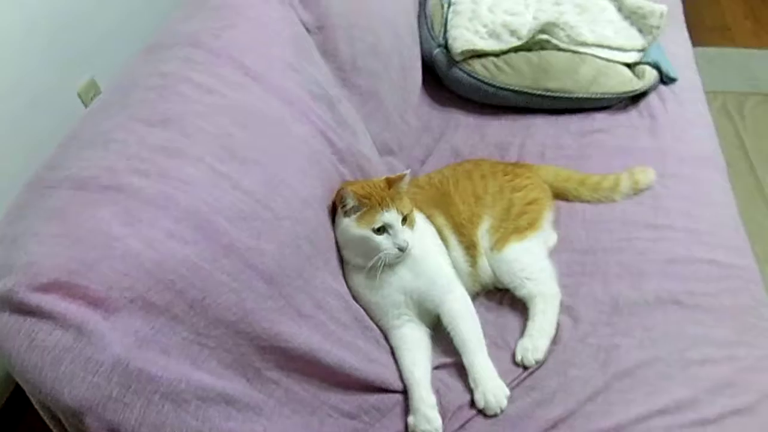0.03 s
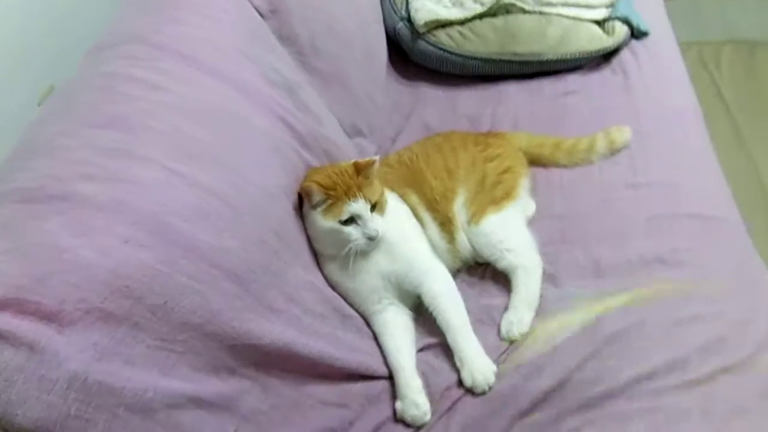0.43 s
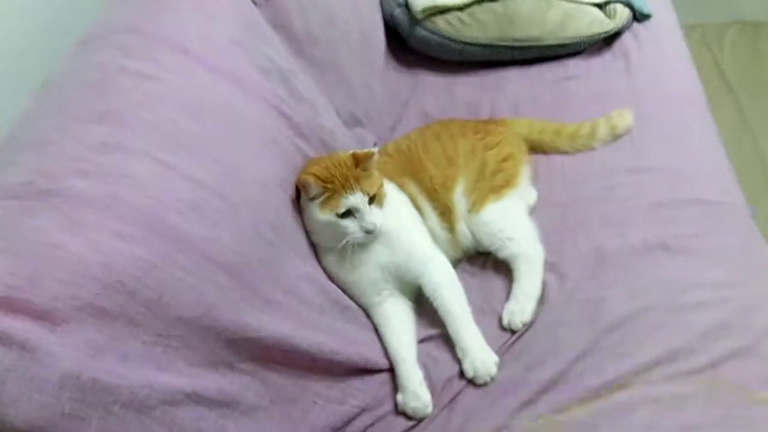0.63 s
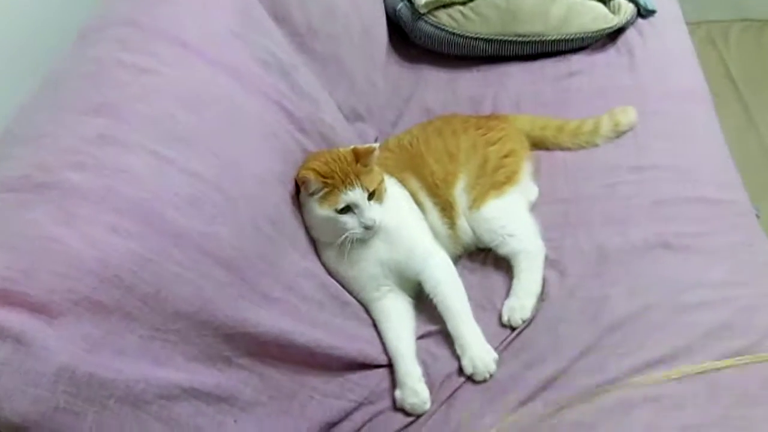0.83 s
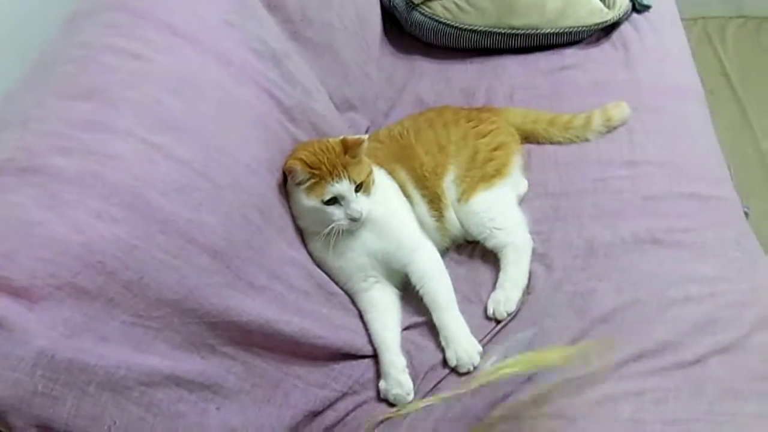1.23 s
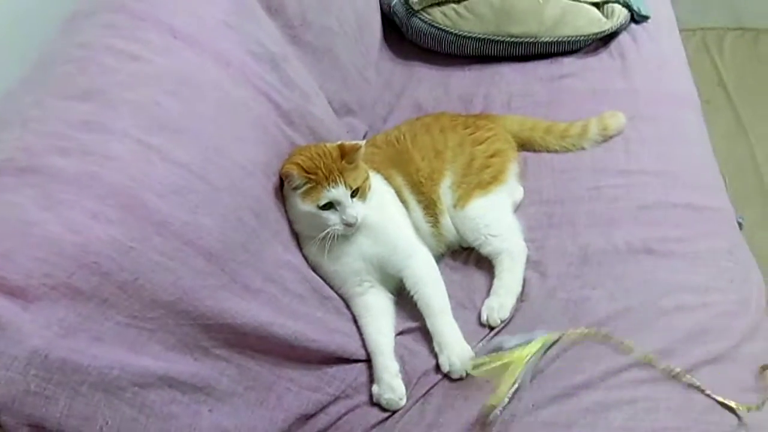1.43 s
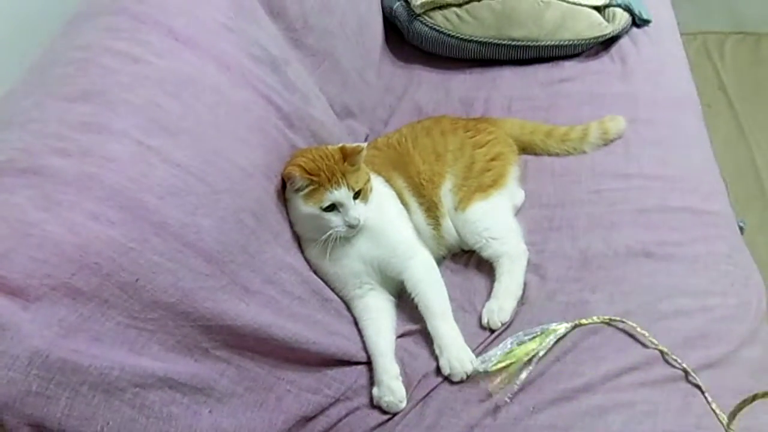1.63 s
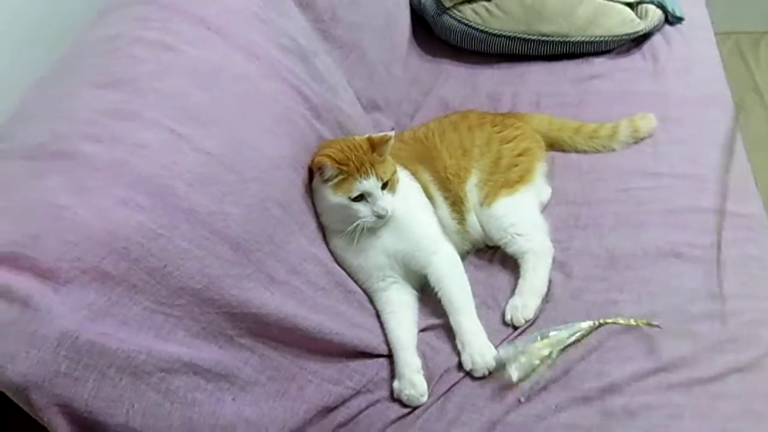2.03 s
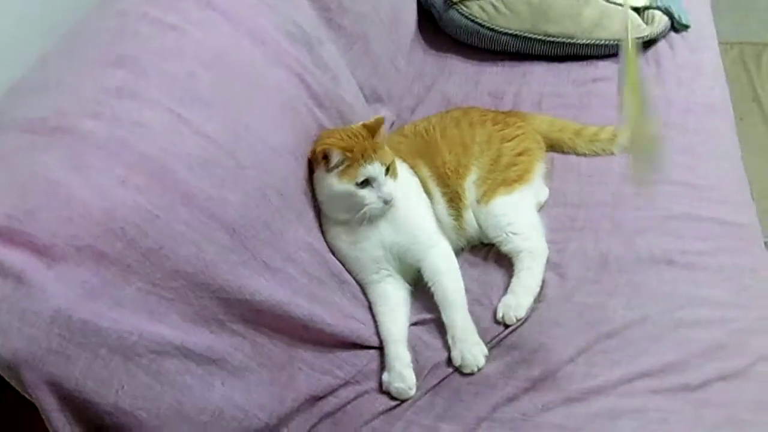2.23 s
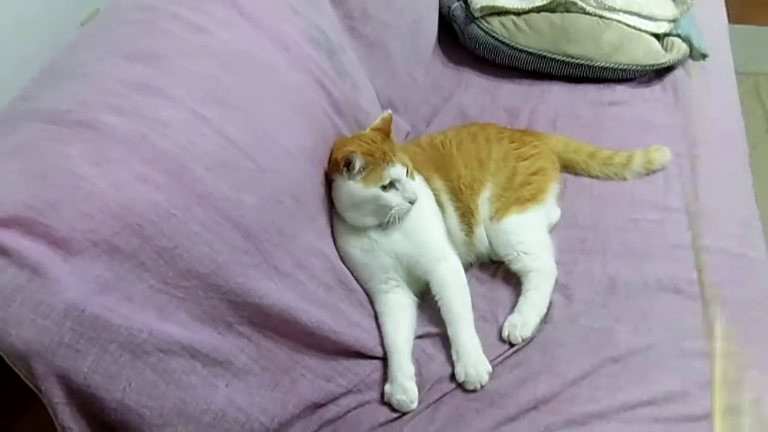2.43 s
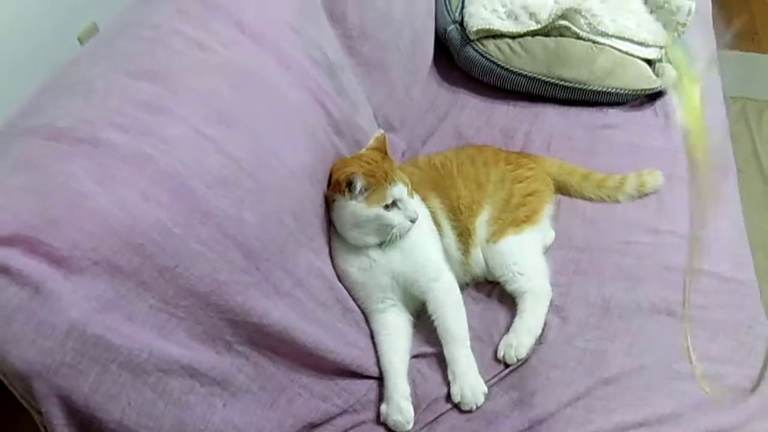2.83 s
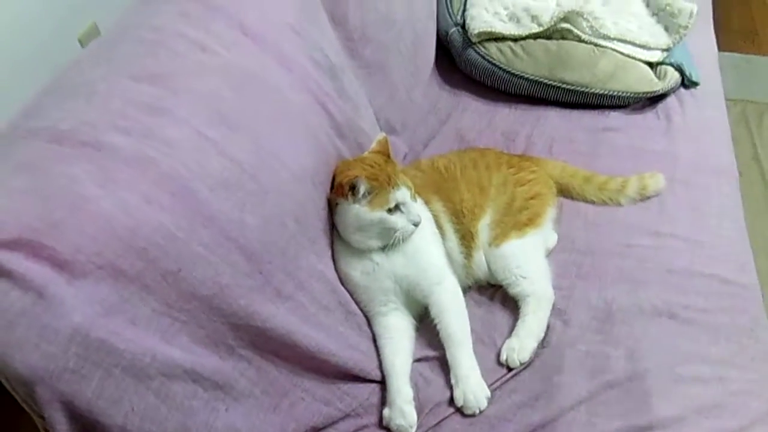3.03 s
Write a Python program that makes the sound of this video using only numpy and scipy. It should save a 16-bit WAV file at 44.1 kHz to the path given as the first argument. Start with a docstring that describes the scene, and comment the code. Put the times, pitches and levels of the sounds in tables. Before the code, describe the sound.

Crinkly rustling bursts from a tassel wand flicked over a sofa, resuming softly after a pause.

```python
"""A foil tassel on a wand is flicked over a sofa about eight times a second, rests, then is shaken softly.
At each turn the strands bunch and crinkle in a swarm of tiny clicks; some snap, and the bunch pats
the cloth. In the pause two strands tick, a faint far whine swells and the wand knocks once.
A small furnished room answers, over a low rumble and faint hiss."""
import sys
import numpy as np
from scipy import signal
from scipy.fft import rfft, irfft
from scipy.io import wavfile

SR = 44100
rng = np.random.default_rng(int(sys.argv[2]) if len(sys.argv) > 2 else 0)


def to_wav(sig):
    """Store sig (one row per channel, or 1-D mono) as 16-bit WAV at the path in sys.argv[1].

    Samples outside -1..1 are clipped; the rate is SR.
    """
    pcm = np.clip(np.atleast_2d(sig), -1, 1) * 32767
    pcm = np.round(pcm).astype(np.int16)
    wavfile.write(sys.argv[1], SR, pcm.T)  # frames by channels


N = 136710
TIME_S = np.arange(N) / SR

# Turns of the wand. Each row: peak time in seconds, crinkle level in dB, rise in seconds,
# fall in seconds, pat level in dB.
WAND_TURNS = [(.118, -45.5, 0.013, 0.03, -55), (0.231, -27.5, 0.0052, 0.012, -35),
              (0.356, -34, 0.0066, 0.02, -42.5), (0.479, -28.5, 0.0062, 0.013, -43.5),
              (.605, -37, 0.016, 0.023, -53), (0.726, -32.5, 0.016, 0.0095, -42.5),
              (0.825, -38.5, 0.024, 0.018, -48.5), (.928, -33.5, 0.016, 0.02, -46),
              (1.038, -36, 0.013, 0.015, -50.5), (1.084, -46, 0.011, .008, -57.5),
              (1.162, -41, 0.019, 0.015, -56), (1.192, -45.5, 0.0099, 0.018, -57),
              (1.977, -51, 0.012, 0.014, -65), (2.211, -39, 0.015, 0.019, -54),
              (2.326, -36.5, 0.016, 0.012, -48.5), (2.455, -44, 0.022, 0.037, -56.5),
              (2.601, -44.5, 0.024, 0.021, -61), (2.695, -45, 0.033, 0.023, -65.5),
              (2.747, -45.5, 0.032, 0.006, -64), (2.815, -39.5, 0.023, 0.02, -59),
              (3.053, -54.5, 0.049, 0.033, -62)]
# Strands whipping together. Each row: start in seconds, level in dB, decay in seconds.
STRAND_SNAPS = [(0.0994, -38, 0.0069), (0.1997, -34, 0.0014), (0.596, -38, 0.0034), (0.7057, -33, 0.0028),
                (0.809, -34.5, 0.012), (1.13, -43, .005), (2.176, -49, .005), (2.353, -43.5, .003),
                (2.578, -42.5, 0.0027), (2.686, -39.5, 0.0026)]
# Lone strands. Each row: start in seconds, level in dB, pitch in Hz, bandwidth in Hz.
STRAND_TICKS = [(1.280, -51, 5600, 1300), (1.439, -55, 8500, 1000)]
# Landings on the cushion. Each row: start in seconds, level in dB, pitch in Hz.
CUSHION_THUMPS = [(.228, -44.5, 243), (0.351, -40.5, 143), (0.716, -50, 284), (0.921, -47.5, 149)]
# Wand resonances. Each row: frequency in Hz, relative level in dB, decay in seconds.
WAND_MODES = [(494, -5, 0.0033), (793, -9.5, 0.0064), (1300, -3, 0.0041), (1870, -2, .003),
              (2330, -0.5, 0.0015), (3140, -1.5, 0.0032), (3680, 1, 0.0018)]
# Source spectra. Each row: frequency in Hz, relative spectral density in dB.
FOIL_SPECTRUM = [(100, -13), (400, -12.5), (1000, -8), (1700, -5.5), (2700, -1), (5000, -0.5), (9500, 1),
                 (15500, 1)]
PAT_SPECTRUM = [(50, -4), (130, -2.5), (260, 1.5), (390, -9), (490, -7), (700, -7.5), (1030, -7.5),
                (1400, -6.5), (1800, -18), (4000, -13), (12000, -12.5)]
RUMBLE_SPECTRUM = [(10, -0.5), (22, 0.5), (42, 0.5), (55, -3), (68, -3), (90, -13), (115, -14), (160, -17),
                   (200, -26.5), (400, -32), (1000, -57)]
HISS_SPECTRUM = [(100, 6), (350, 7.5), (600, 3.5), (1300, 4), (2300, 1.5), (4000, 0), (8000, -2),
                 (16000, -1)]


def tassel(settle_db=-19, settle_s=0.045, loose_db=-10, loose_stretch=2.1):
    """Bunched strands crinkle at each turn and slide to rest; some snap; loose ones crackle longer."""
    bunch_power = loose_power = 0
    for peak_s, db, rise_s, fall_s, _ in WAND_TURNS:
        turn = undb(db) * swell(peak_s, rise_s, fall_s)
        settle = undb(db + settle_db) * swell(peak_s, rise_s, settle_s)
        loose = undb(db + loose_db) * swell(peak_s, rise_s * loose_stretch, fall_s * loose_stretch)
        bunch_power += turn ** 2 + settle ** 2
        loose_power += loose ** 2
    snap_gain = sum(undb(db) * burst(start_s, decay_s, rise_s=0.0028, hold_s=0.0047)
                    for start_s, db, decay_s in STRAND_SNAPS)
    bunch = np.sqrt(bunch_power) * crinkle(clicks_per_s=6000)
    snaps = snap_gain * crinkle(clicks_per_s=18000)
    crackle = np.sqrt(loose_power) * crinkle(clicks_per_s=300, spread_db=3.5, fizz_s=0.0014, fizz_db=11)
    return colour(bunch + snaps + crackle, FOIL_SPECTRUM)


def crinkle(clicks_per_s, spread_db=3.7, fizz_s=0.0007, fizz_db=-2):
    """Foil buckles in random clicks of uneven size, each with a brief fizz; rms 1."""
    size = undb(spread_db * np.clip(rng.standard_normal(N), -2, 2))
    buckles = rng.random(N) < clicks_per_s / SR
    clicks = buckles * size * np.sign(rng.standard_normal(N))
    pole = np.exp(-2 / (fizz_s * SR))
    fizz_power = signal.lfilter([1 - pole], [1, -pole], clicks ** 2 + 1e-18)
    fizz = np.sqrt(fizz_power) * rng.standard_normal(N)
    return unit_rms(clicks + undb(fizz_db) * fizz)


def pats():
    """The bunch pats the cloth at each turn; some landings thump the cushion."""
    pat_gain = sum(undb(db) * swell(peak_s, rise_s, fall_s)
                   for peak_s, _, rise_s, fall_s, db in WAND_TURNS)
    thumps = 0
    for start_s, db, hz in CUSHION_THUMPS:
        envelope = burst(start_s, decay_s=0.013, rise_s=0.0041, hold_s=0.0041)
        thumps += undb(db) * envelope * noise_band(hz, width_hz=0.62 * hz)
    return pat_gain * colour(rng.standard_normal(N), PAT_SPECTRUM) + thumps


def ticks(click_db=-2):
    """Lone strands spring back in the pause: a short ring and a broad click."""
    sound = 0
    for start_s, db, hz, width_hz in STRAND_TICKS:
        envelope = burst(start_s, decay_s=0.0011, rise_s=0.0003, hold_s=0.00056)
        ring = noise_band(hz, width_hz)
        click = undb(click_db) * noise_band(hz=10000, width_hz=15000)
        sound += undb(db) * envelope * (ring + click)
    return sound


def wand_knock(start_s=2.0275, level_db=-50.5):
    """A light knock rings the wand's damped modes, alternating in sign."""
    age_s = np.maximum(TIME_S - start_s, 0)
    return sum((-1) ** k * undb(level_db + db) * np.exp(-age_s / decay_s) * np.sin(2 * np.pi * hz * age_s)
               for k, (hz, db, decay_s) in enumerate(WAND_MODES))


def room_echo(sound, t60_s=0.25, delay_s=0.008, level_db=-16):
    """Diffuse reflections: convolution with delayed, decaying noise."""
    age_s = TIME_S[:N // 4]
    onset = np.clip(age_s / delay_s - 1, 0, 1)
    response = rng.standard_normal(len(age_s)) * undb(-60 * age_s / t60_s) * onset
    response /= np.linalg.norm(response)
    return undb(level_db) * signal.fftconvolve(sound, response)[:N]


def whine(pitch_hz=1366, wander_hz=12, level_db=-69):
    """A far, wandering tone swells and stops."""
    hz = pitch_hz + wander_hz * noise_band(hz=11, width_hz=20)
    envelope = swell(peak_s=1.93, rise_s=0.12, fall_s=0.032)
    return undb(level_db) * envelope * np.sin(2 * np.pi * np.cumsum(hz) / SR)


def background(rumble_db=-53, waver_db=0.5, hiss_db=-63):
    """Wavering low rumble and steady hiss."""
    waver = undb(-waver_db * noise_band(hz=5.6, width_hz=6.1))
    rumble = undb(rumble_db) * waver * colour(rng.standard_normal(N), RUMBLE_SPECTRUM)
    hiss = undb(hiss_db) * colour(rng.standard_normal(N), HISS_SPECTRUM)
    return rumble + hiss


def undb(db):
    """Decibels to gain."""
    return 10 ** (np.asarray(db) / 20)


def unit_rms(x):
    """Scale to rms 1."""
    return x / np.sqrt(np.mean(x ** 2) + 1e-18)


def colour(x, spectrum):
    """Filter by a spectrum, keeping the power of a white input."""
    hz, db = np.array(spectrum).T
    bin_hz = np.maximum(np.arange(N + 1) * SR / (2 * N), 1)
    gain = unit_rms(undb(np.interp(np.log(bin_hz), np.log(hz), db)))
    return irfft(rfft(x, 2 * N) * gain)[:N]


def noise_band(hz, width_hz):
    """Noise in a resonance; rms 1."""
    bin_hz = np.maximum(np.arange(N // 2 + 1) * SR / N, 1)
    detuning = (bin_hz ** 2 - hz ** 2) / (bin_hz * width_hz)
    return unit_rms(irfft(rfft(rng.standard_normal(N)) / (1 + detuning ** 2), N))


def swell(peak_s, rise_s, fall_s):
    """Exponential rise and fall about a peak."""
    return np.exp(-np.maximum((peak_s - TIME_S) / rise_s, (TIME_S - peak_s) / fall_s))


def burst(start_s, decay_s, rise_s, hold_s):
    """Linear attack; exponential decay from hold_s after the start."""
    age_s = TIME_S - start_s
    return np.clip(age_s / rise_s, 0, 1) * np.exp(-np.maximum(age_s - hold_s, 0) / decay_s)


def scene():
    """Tassel and wand, their room echo and the background; mono."""
    toy = tassel() + pats() + ticks() + wand_knock()
    return (toy + room_echo(toy) + background() + whine())[None, :]


def record(dry):
    """Steep elliptic low-pass."""
    cutoff_hz = 15750
    return signal.sosfilt(signal.ellip(10, 0.2, 70, cutoff_hz, fs=SR, output="sos"), dry)


dry = scene()
out = record(dry)
to_wav(out)
```